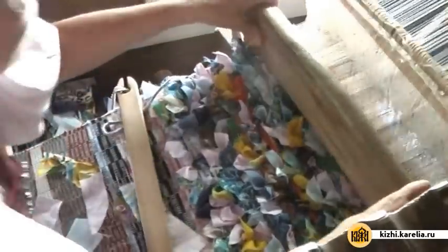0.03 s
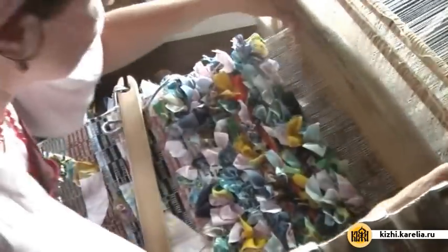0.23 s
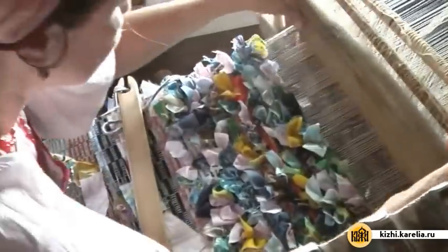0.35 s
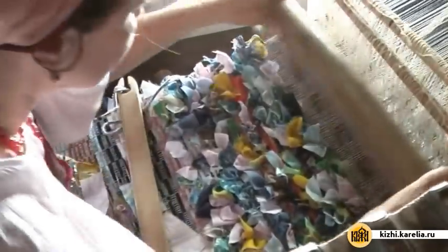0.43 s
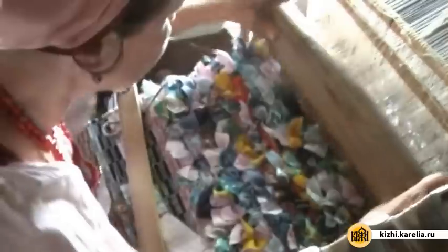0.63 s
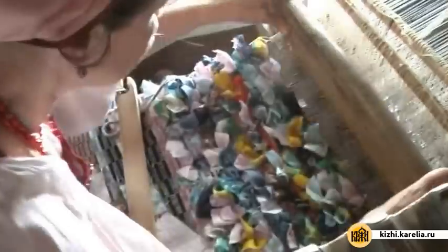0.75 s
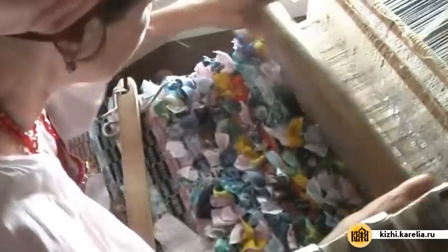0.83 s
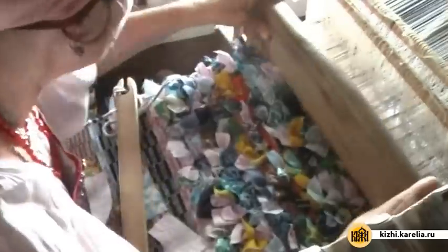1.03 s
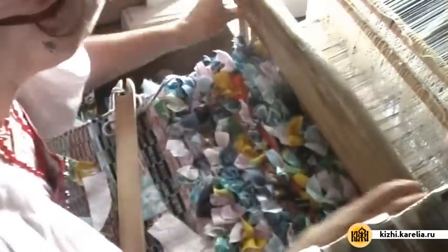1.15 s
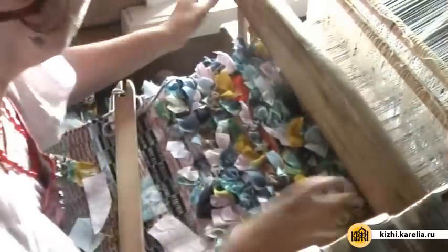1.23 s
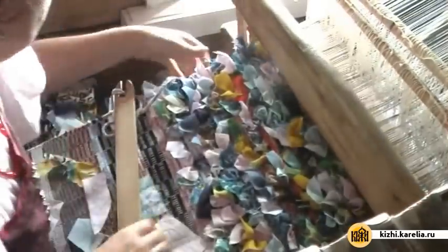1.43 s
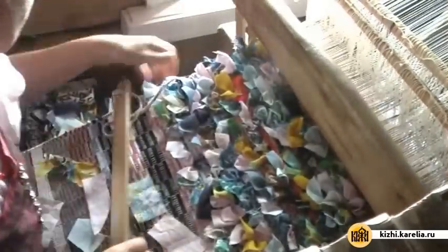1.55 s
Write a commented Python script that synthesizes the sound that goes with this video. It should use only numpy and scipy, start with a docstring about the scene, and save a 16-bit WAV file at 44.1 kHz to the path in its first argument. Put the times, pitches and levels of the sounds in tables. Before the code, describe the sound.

A wooden hand loom knocks and clacks, then its beater thumps twice into the cloth, each blow with a crunch and a rattle of loose parts. Threads rustle underneath, heard close in a small room.

```python
"""Wooden hand loom, close, in a small room: the beater is pulled twice against the cloth.
The reed crunches into the weft, the frame thumps and booms, loose parts rattle and tick.
Before the pulls: a soft pivot squeak, hollow frame knocks, a slat clack. Underneath, warp threads
rustle and moving wood scrapes and shudders. A last small clack, then faint room air."""
import sys
import numpy as np
from scipy import signal
from scipy.fft import rfft, irfft
from scipy.io import wavfile

SR = 44100
rng = np.random.default_rng(int(sys.argv[2]) if len(sys.argv) > 2 else 0)


def to_wav(s):
    """Save 16-bit WAV."""
    ch = np.atleast_2d(s).T  # columns
    pcm = np.round(np.clip(ch, -1, 1) * 32767)  # PCM
    wavfile.write(sys.argv[1], SR, pcm.astype(np.int16))


N = 70560
TIME_S = np.arange(N) / SR
RING_S = TIME_S[:SR * 3 // 4]  # time axis of one hit

# reed packing the weft (time [s], level [dB], T60 [s])
CRUNCHES = [(0.557, -23.5, .45), (0.9211, -22, 0.49)]
# beater blows on the frame (time [s], level [dB], tilt [dB/oct], boom level [dB])
THUMPS = [(0.5966, -19, 2.5, -27), (.616, -23, 3.5, -22), (.657, -37, -6, -21), (0.748, -42, -1.5, -22.5),
          (0.958, -26.5, -7, -42), (0.9691, -21.5, 0.5, -12.5), (0.989, -26.5, 5, -33),
          (1.019, -28.5, -8.5, -15)]
# beater parts rattling (time [s], level [dB], tilt [dB/oct])
CLACKS = [(.048, -40, -1), (0.164, -40, -1.5), (.180, -37, -1.5), (0.421, -46.5, -4), (0.472, -42, 5.5),
          (0.511, -39, 6), (.561, -23, 2.5), (.671, -24.5, -9), (0.678, -20, -7), (0.694, -24, -2.5),
          (.781, -35.5, -4.5), (.797, -38, -4.5), (0.92, -22, 2), (0.928, -32, 5), (0.9473, -22.5, 0.5),
          (0.9511, -33.5, 6), (1.010, -29.5, 4), (1.033, -32, -4), (1.064, -32, 5.5), (1.071, -25, -6),
          (1.103, -33, 1.5), (1.125, -29, -8.5), (1.148, -34.5, -1), (1.201, -42.5, 5.5), (1.21, -36, -4),
          (1.231, -42.5, -5), (1.3024, -47, -9.5), (1.3381, -38.5, 2.5), (1.518, -52, 5.5)]
# reed ticks, frame knocks, slat hits (time [s], level [dB])
TICKS = [(0.3602, -7.5), (0.6792, -9.5), (0.6917, -2), (1.072, -14.5), (1.105, -12.5), (1.128, -11)]
KNOCKS = [(0.2106, -21), (0.2251, -23), (.257, -32)]
SLAT_HITS = [(0.2976, -19.5), (.378, -38.5)]
# pivot squeaks (time [s], length [s], pitch [Hz], level [dB])
SQUEAKS = [(0.165, 0.027, 560, -33.5)]
# wood scrapes (time [s], length [s], level [dB])
SCRAPES = [(0.461, 0.07, -44), (0.788, 0.053, -41)]
# thread rustle and frame shudder envelopes (time [s], level [dB])
RUSTLE_LEVEL = [(0, -45), (.04, -48), (.12, -45.5), (.18, -39.5), (.28, -44), (.40, -41.5), (.462, -50),
                (.48, -39.5), (.55, -37), (.64, -33), (.74, -40.5), (.81, -39), (.85, -49.5), (.91, -40.5),
                (1.13, -41.5), (1.2, -50), (1.28, -59), (1.5, -62.5), (1.525, -51.5), (1.6, -51.5)]
SHUDDER_LEVEL = [(0, -50.5), (.13, -42.5), (.19, -50), (.34, -41), (.42, -45), (.46, -55), (.5, -42.5),
                 (.8, -35), (.89, -45.5), (1.1, -34), (1.27, -42), (1.32, -52), (1.6, -71)]

# wood modes (frequency [Hz], relative level [dB], T60 [s])
FRAME_MODES = [(87.9, -19, 0.84), (112.7, -2.5, .28), (133.4, -10, 0.26), (168, -44, 0.26),
               (192.5, 2, 0.64), (226.7, -2.5, 0.17), (254.7, -0.5, 0.25), (339, -6, 0.43),
               (383.2, -9, 0.61), (440, -10, 0.22), (521, -7.5, 0.21), (648, -10, 0.4), (778, -11.5, .35),
               (972, -10, 0.21)]
SLAT_MODES = [(1120, -7, .4), (1340, -2, .3), (1690, -2, .18), (2284, -9, .25), (2490, -7, .3),
              (2655, -3, .24), (2950, -6, .25), (3365, -1, .3), (3430, -3, .24), (4090, -8, .22),
              (4230, -6, .25), (4683, 0, .1), (5163, 0, .08), (5830, -11, .2)]
# source spectra (frequency [Hz], relative level [dB])
CRUNCH_SPECTRUM = [(100, -11.5), (200, 1.5), (350, -8.5), (540, 1.5), (800, -4), (1050, -0.5), (1500, -4.5),
                   (1900, -9.5), (3200, -14), (5200, -14.5), (7500, -21.5), (10000, -18), (13000, -33),
                   (16000, -33)]
THUMP_SPECTRUM = [(30, -35), (60, -25), (100, 0), (240, 2.5), (298, 0), (350, -5.5), (450, -3), (580, -4.5),
                  (660, 0.5), (850, -10), (1500, -18), (3500, -31.5), (8000, -59.5)]
CLACK_SPECTRUM = [(150, -20), (400, -12.5), (900, -5.5), (1250, 3), (1700, 2), (2100, -3), (2650, 4.5),
                  (3400, -1.5), (5100, -2), (7000, -7.5), (11000, -16.5), (16000, -33)]
TICK_SPECTRUM = [(500, -31), (2000, -15.5), (4000, -16.5), (5500, -8), (7600, -22.5), (9000, -2.5),
                 (10300, 0.5), (12000, -7.5), (14000, -20.5), (16000, -19)]
KNOCK_SPECTRUM = [(50, -28), (120, -11), (190, -10), (242, 2), (295, -9), (345, 1), (395, 3), (460, -6),
                  (560, -6), (680, -10), (850, -19), (1320, -11), (1900, -23), (4000, -38), (16000, -60)]
SLAT_SPECTRUM = [(150, -34), (800, -21), (1000, -5.5), (1250, -4), (2100, -5.5), (3300, -2), (5400, -1),
                 (6800, -12), (9000, -24), (16000, -39)]
SCRAPE_SPECTRUM = [(200, -33), (1150, -20), (1330, -4), (1440, 1), (1510, 4), (1580, -2), (1720, -35),
                   (4000, -29), (16000, -50)]
RUSTLE_SPECTRUM = [(100, -18), (300, 3), (800, -4), (1150, -1), (1450, -1.5), (1850, -5), (2900, -5.5),
                   (5000, -11.5), (9000, -9.5), (12500, -16.5), (16000, -24.5)]
SHUDDER_SPECTRUM = [(30, -29), (70, -18.5), (110, -2.5), (145, -10), (190, 6.5), (225, -13.5), (260, -3.5),
                    (300, -9), (340, -5), (400, -13), (550, -19), (1000, -18), (3000, -68.5)]
AIR_SPECTRUM = [(30, -5.5), (100, 15), (300, -2.5), (700, -24.5), (2000, -17), (6000, -15), (10000, -14.5),
                (16000, -35)]
# decay of struck wood and room (frequency [Hz], T60 [s])
THUMP_DECAY = [(80, 0.54), (300, 0.35), (1000, 0.17), (4000, 0.23)]
CLACK_DECAY = [(300, 0.28), (1400, 0.13), (3300, 0.069), (5500, 0.046), (12000, 0.094)]
KNOCK_DECAY = [(120, 0.34), (400, 0.32), (1500, 0.23), (5000, 0.033)]
SLAT_DECAY = [(300, 0.28), (1400, 0.38), (3300, 0.22), (5500, 0.051), (12000, .06)]
ROOM_DECAY = [(100, 0.13), (600, 0.46), (2000, .34), (5000, 0.15), (12000, 0.053)]
# reflections off nearby beams (left delay [s], right delay [s], gain [dB])
ECHOES = [(.0023, 0.0028, -29.5), (.0052, 0.0042, -22.5), (.0089, 0.0079, -17.5)]
# stereo image (frequency [Hz], left-right correlation [0..1])
CORRELATION = [(60, 0.75), (150, 0.92), (300, 1), (500, 0.45), (1000, 0.98), (4000, 0.84), (9000, 1),
               (14000, 0.23)]


def reed_crunch(rise_s=0.0035):
    """Reed packs the weft: decaying bursts of dense fibre slips."""
    press = np.zeros(N)
    for start_s, db, t60_s in CRUNCHES:
        age_s = np.maximum(TIME_S - start_s, 0)
        press += amp(db - 60 * age_s / t60_s) * np.minimum(age_s / rise_s, 1)
    return press * colour(grains(per_s=6900, spread_db=1.5), CRUNCH_SPECTRUM)


def beater_thumps(rise_s=0.0012):
    """Each blow thuds and sets the frame modes booming."""
    out = np.zeros((2, N))
    for start_s, db, tilt_db_oct, boom_db in THUMPS:
        thud = amp(db) * wood(THUMP_SPECTRUM, THUMP_DECAY, tilt_db_oct)
        boom = amp(boom_db) * modes(FRAME_MODES, tilt_db_oct)
        add(out, start_s, (thud + boom) * np.minimum(RING_S / rise_s, 1))
    return out


def beater_rattle():
    """Loose beater parts collide in dry clacks."""
    out = np.zeros((2, N))
    for start_s, db, tilt_db_oct in CLACKS:
        add(out, start_s, amp(db) * snap(wood(CLACK_SPECTRUM, CLACK_DECAY, tilt_db_oct)))
    return out


def reed_ticks(tail_db=-16.5, ring_t60_s=0.03, chatter_t60_s=0.0019, pan_db=0.5):
    """Sharp, high impulses with brief chatter and a faint ring."""
    out = np.zeros((2, N))
    hz = abs(np.fft.fftfreq(len(RING_S), 1 / SR))
    log_gain = np.log(amp(at_hz(TICK_SPECTRUM, hz)))
    click = np.fft.ifft(np.exp(np.conj(signal.hilbert(log_gain)))).real  # minimum phase
    click /= abs(click).max()
    for start_s, db in TICKS:
        ring = amp(tail_db) * decay(ring_t60_s) * hit_noise(TICK_SPECTRUM)
        chatter = amp(tail_db) * decay(chatter_t60_s) * hit_noise(TICK_SPECTRUM)
        add(out, start_s, amp(db) * (click + chatter + ring))
    return out * amp([[pan_db], [-pan_db]])


def frame_knocks(rise_s=0.0022):
    """The frame rings low and hollow."""
    out = np.zeros((2, N))
    for start_s, db in KNOCKS:
        add(out, start_s, amp(db) * wood(KNOCK_SPECTRUM, KNOCK_DECAY) * np.minimum(RING_S / rise_s, 1))
    return out


def slat_clacks(modes_db=-3):
    """A loose slat hits hard and rings in its modes."""
    out = np.zeros((2, N))
    ring = amp(modes_db) * modes(SLAT_MODES)
    for start_s, db in SLAT_HITS:
        add(out, start_s, amp(db) * (snap(wood(SLAT_SPECTRUM, SLAT_DECAY)) + ring))
    return out


def pivot_squeak():
    """Wood turns on wood as the beater starts to swing: a short, soft tone."""
    out = np.zeros((2, N))
    for start_s, length_s, hz, db in SQUEAKS:
        arch = np.sin(np.pi * np.minimum(RING_S / length_s, 1))
        add(out, start_s, amp(db) * arch * np.sin(2 * np.pi * hz * RING_S))
    return out


def beater_scrape(edge_s=0.012):
    """The swinging beater scrapes wood: narrow-band friction."""
    swing = np.zeros(N)
    for start_s, length_s, db in SCRAPES:
        age_s = TIME_S - start_s
        swing += amp(db) * np.clip(np.minimum(age_s, length_s - age_s) / edge_s, 0, 1)
    return swing * colour(grains(per_s=1500, spread_db=1.8), SCRAPE_SPECTRUM)


def warp_rustle():
    """Warp threads rub through the reed."""
    return envelope(RUSTLE_LEVEL) * colour(grains(per_s=11000, spread_db=5), RUSTLE_SPECTRUM)


def frame_shudder():
    """Low, grainy vibration of the moving frame."""
    return envelope(SHUDDER_LEVEL) * colour(grains(per_s=900, spread_db=1.66), SHUDDER_SPECTRUM)


def beam_echoes(x):
    """First reflections, arriving slightly apart left and right."""
    out = np.zeros((2, N))
    for *delays_s, db in ECHOES:
        for side, delay_s in enumerate(delays_s):
            out[side] += amp(db) * np.interp(TIME_S - delay_s, TIME_S, x[side], left=0)
    return out


def room_reverb(x, taps_per_s=3000, predelay_s=0.004, gain_db=-14):
    """Sparse reflections off close wooden walls."""
    taps = rng.standard_normal((2, len(RING_S))) * (rng.random(len(RING_S)) < taps_per_s / SR)
    tail = band_decay(taps * (RING_S > predelay_s), ROOM_DECAY)
    tail /= np.linalg.norm(tail, axis=1, keepdims=True)
    return amp(gain_db) * signal.fftconvolve(x, tail, axes=1)[:, :N]


def room_air(level_db=-63):
    """Faint, steady low noise."""
    return amp(level_db) * colour(rng.standard_normal((2, N)), AIR_SPECTRUM)


def wood(spectrum, decay_table, tilt_db_oct=0):
    """Dense, fast-dying ring of struck wood."""
    return band_decay(hit_noise(spectrum, tilt_db_oct), decay_table)


def modes(table, tilt_db_oct=0):
    """Decaying sines; a softer blow (negative tilt) favours the low ones."""
    hz, db, t60_s = np.transpose(table)[:, :, None]
    gain = amp(db + tilt_db_oct * np.log2(hz))
    sign = (-1) ** np.arange(len(table))[:, None]
    partials = sign * gain * decay(t60_s) * np.sin(2 * np.pi * hz * RING_S)
    return partials.sum(0) / np.linalg.norm(gain)


def snap(ring, extra_db=4, tau_s=0.0006):
    """First contact stands above the ring."""
    return ring * (1 + amp(extra_db) * np.exp(-RING_S / tau_s))


def grains(per_s, spread_db):
    """Tiny slips: random impulses of uneven size."""
    size = amp(spread_db * np.minimum(rng.exponential(1, N), 4))
    slips = rng.random(N) < per_s / SR
    return size * slips * rng.choice([-1, 1], (2, N))


def hit_noise(spectrum, tilt_db_oct=0):
    """Shaped stereo noise, one hit long."""
    return colour(rng.standard_normal((2, len(RING_S))), spectrum, tilt_db_oct)


def colour(pair, spectrum, tilt_db_oct=0, tilt_corner_hz=230):
    """Spectrum and stereo correlation for two independent signals; output rms 1."""
    hz = np.fft.rfftfreq(pair.shape[1], 1 / SR)
    correlation = at_hz(CORRELATION, hz)
    mid, side = rfft(pair) * np.sqrt([1 + correlation, 1 - correlation])
    gain = amp(at_hz(spectrum, hz) + tilt_db_oct * np.log2(np.hypot(hz, tilt_corner_hz)))
    shaped = irfft(np.array([mid + side, mid - side]) * gain, pair.shape[1])
    return shaped / np.sqrt(np.mean(shaped ** 2) + 1e-20)


def band_decay(x, decay_table):
    """Each octave dies at its own rate."""
    hz = np.fft.rfftfreq(x.shape[1], 1 / SR)
    centres_hz = np.geomspace(30, 15000, 10)
    bins = rfft(x)
    out = np.zeros_like(x)
    for centre_hz, band in zip(centres_hz, np.eye(len(centres_hz))):
        weight = np.interp(np.log(hz + 1), np.log(centres_hz), band)
        out += irfft(bins * weight, x.shape[1]) * decay(at_hz(decay_table, centre_hz))
    return out


def decay(t60_s):
    """Gain falling 60 dB per T60."""
    return amp(-60 * RING_S / t60_s)


def envelope(table):
    """Level table to gain over time."""
    return amp(np.interp(TIME_S, *np.transpose(table)))


def at_hz(table, hz):
    """Table lookup on a log-frequency axis."""
    points_hz, values = np.transpose(table)
    return np.interp(np.log(hz + 1), np.log(points_hz + 1), values)


def amp(db):
    """dB to gain."""
    return 10 ** (np.asarray(db) / 20)


def add(mix, start_s, sound):
    """Mix in at start_s."""
    part = mix[:, round(start_s * SR):][:, :sound.shape[-1]]
    part += sound[..., :part.shape[1]]


def scene():
    """Loom, reflections, air."""
    body = reed_crunch() + beater_thumps() + frame_knocks() + slat_clacks() + beater_rattle()
    body += pivot_squeak() + warp_rustle() + beater_scrape() + frame_shudder()
    loom = body + beam_echoes(body) + reed_ticks()
    return loom + room_reverb(loom) + room_air()


def record(dry, low_cut_hz=20.7, high_cut_hz=16000):
    """Bass cut and band limit."""
    highpass = signal.butter(1, low_cut_hz, "high", fs=SR, output="sos")
    lowpass = signal.firwin(255, high_cut_hz, window=("kaiser", 9), fs=SR)
    return signal.oaconvolve(signal.sosfilt(highpass, dry), lowpass[None], "same")


dry = scene()
out = record(dry)
to_wav(out)
```